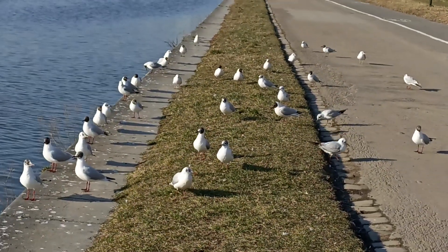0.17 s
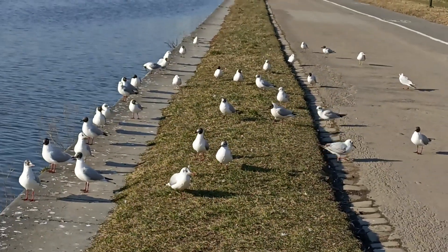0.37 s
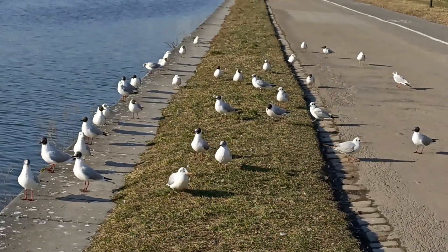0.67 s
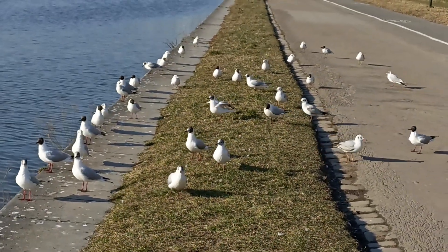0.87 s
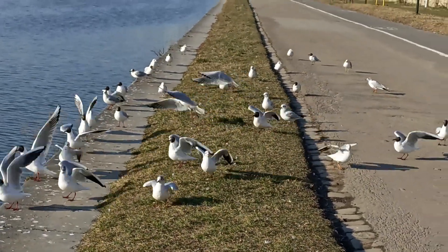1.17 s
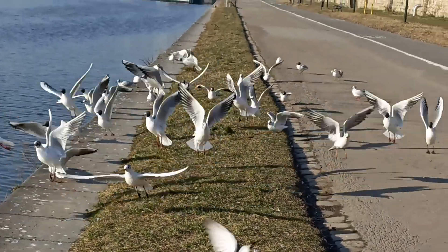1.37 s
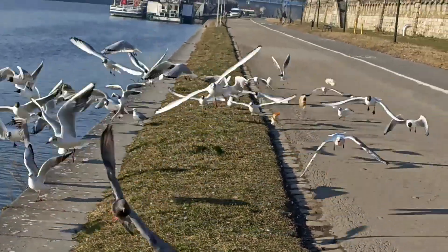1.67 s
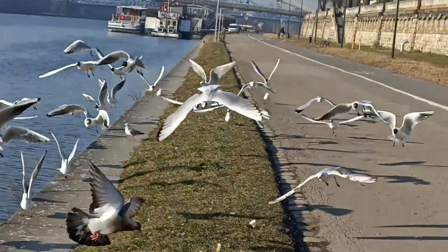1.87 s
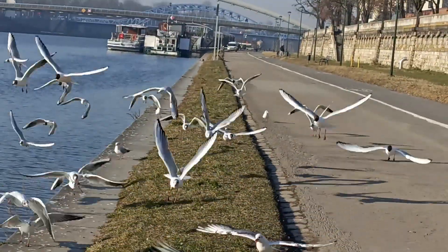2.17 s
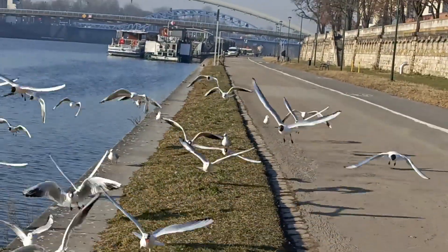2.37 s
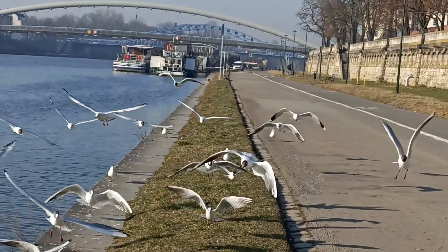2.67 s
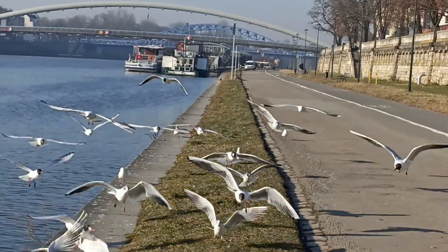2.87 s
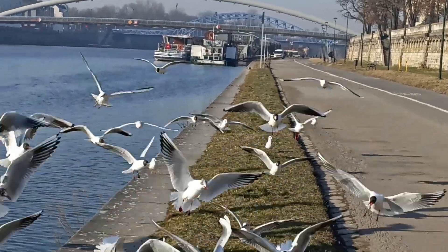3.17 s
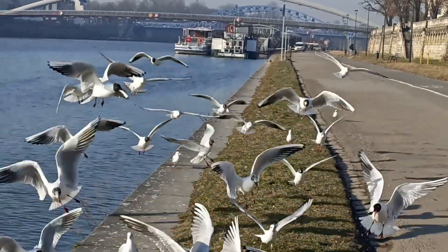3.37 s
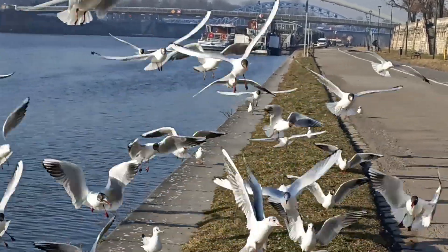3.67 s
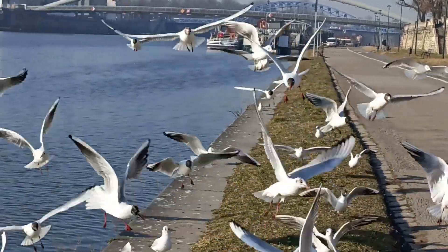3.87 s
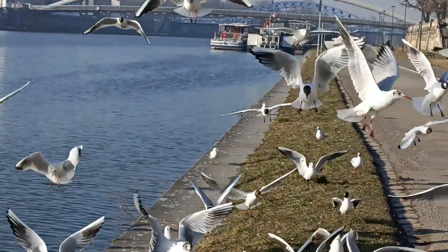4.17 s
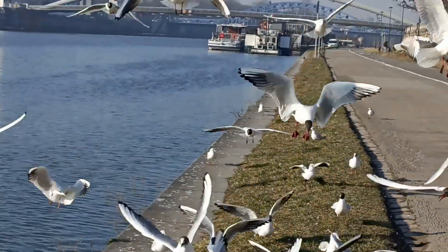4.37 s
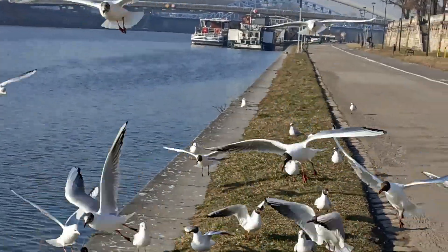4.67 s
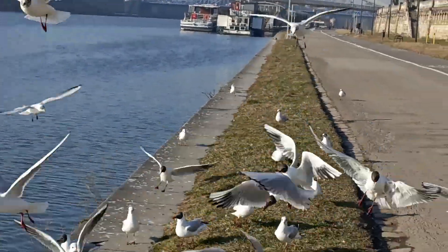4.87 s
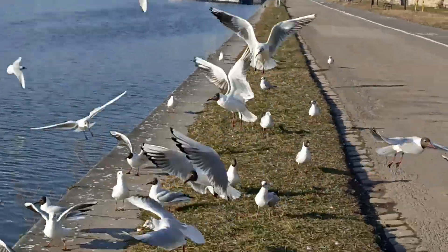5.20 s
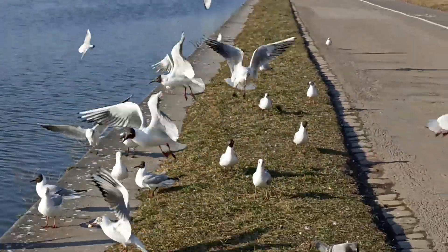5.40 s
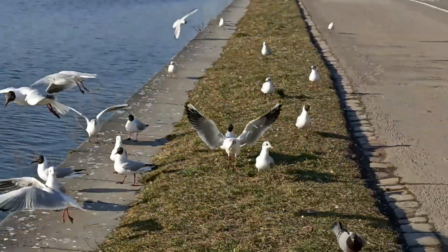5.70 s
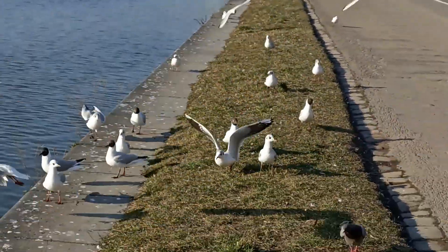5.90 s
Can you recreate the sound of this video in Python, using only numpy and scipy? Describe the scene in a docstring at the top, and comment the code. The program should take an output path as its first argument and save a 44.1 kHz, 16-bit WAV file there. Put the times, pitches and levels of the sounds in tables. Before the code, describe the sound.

Outdoors on a riverbank, low distant traffic and a tiny far songbird open quietly. After about a second gulls lift off with soft wing thumps and feather rustle, then short, rough, nasal squawks crowd in, mostly close on the left, with one longer climbing bird on the right. The squawking thins out and the flock settles to faint calls and flicks. Close stereo microphone.

```python
"""Gulls at a riverbank

Gulls take off and squawk over food, most of them close on the left, one on the right.
Each voice is a jittery harmonic stack with noise, chopped into fast throbs and filtered by resonances.
Wings rustle, thump and wash the air as shaped noise; a pigeon coos and a far tit sings two notes as
gliding or trembling sines; city traffic hums across the water as low noise."""
import sys
import numpy as np
from scipy import signal
from scipy.fft import rfft, irfft, next_fast_len
from scipy.io import wavfile
from scipy.ndimage import uniform_filter1d, map_coordinates

SR = 44100
rng = np.random.default_rng(int(sys.argv[2]) if len(sys.argv) > 2 else 0)


def generate_wav(sig):
    """Save sig (samples, or channels by samples) to the path in sys.argv[1] as 16-bit PCM at SR."""
    pcm = np.round(np.clip(np.atleast_2d(sig).T, -1, 1) * 32767).astype(np.int16)
    wavfile.write(sys.argv[1], SR, pcm)


N = 266364  # samples


def amp(db):
    """Decibels are a logarithm of amplitude: 20 dB is a factor of ten."""
    return 10 ** (np.asarray(db) / 20)


def unit(x):
    """Normalisation by mean power: scales x to an rms of 1."""
    return x / np.sqrt(np.mean(x ** 2) + 1e-20)


def along(points, hz):
    """Logarithmic frequency scale: interpolates (Hz, value) points along it."""
    f, v = np.transpose(points)
    return np.interp(np.log(hz + 1), np.log(f + 1), v)


def level(rows):
    """Amplitude envelope: gain per sample from (s, dB) rows, at -150 dB outside them."""
    s, db = np.transpose(rows)
    return amp(np.interp(np.arange(N) / SR, s, db, left=-150, right=-150))


def wobble(rate, size=N):
    """Band-limited random modulation: a smooth curve through rate random knots a second, at most 1000."""
    knots = rng.standard_normal(int(size * 1000 / SR) + 4)
    return map_coordinates(knots, [np.arange(size) * min(rate, 1000) / SR])


def filtered(x, response):
    """Linear filtering: the spectrum of x times a complex response of frequency."""
    n = x.shape[-1]
    m = next_fast_len(n + 4096)
    return irfft(rfft(x, m) * response(np.fft.rfftfreq(m, 1 / SR)), m)[..., :n]


def resonance(f, hz, width_hz):
    """Damped resonance: its gain at frequency f, 1 at the centre."""
    return f * width_hz / np.hypot(hz * hz - f * f, f * width_hz)


def rush(spectrum, alike, patchy_db):
    """Turbulent noise: coloured, of set left-right likeness, patchy in time and pitch, rms 1 on the left."""
    z = signal.stft(rng.standard_normal((2, N)), nperseg=512)[2]
    field = uniform_filter1d(rng.standard_normal(z.shape[1:]), size=6, axis=0)
    field = uniform_filter1d(field, size=10, axis=1)
    pair = signal.istft(z * amp(patchy_db * unit(field)), nperseg=512)[1][:, :N]

    def mid_side_response(hz):
        # weights cos and sin of half the angle give mid + side and mid - side the wanted correlation
        turn = np.arccos(np.clip(along(alike, hz), -1, 1)) / 2
        return amp(along(spectrum, hz)) * [np.cos(turn), np.sin(turn)]

    mid, side = filtered(pair, mid_side_response)
    return np.array([mid + side, mid - side]) / np.std(mid + side)


def add(out, s, sound):
    """Superposition: sums a sound into out from s seconds on."""
    start = round(s * SR)
    out[:, start:start + sound.shape[-1]] += sound[..., :N - start]


def gulls():
    """Comb interference: the climbing bird is heard with a sliding echo, among the direct cries of the flock."""
    # Short squawks. Each row: start, rise, hold and fall in seconds, crest level in dB, crest pitch in Hz,
    # throbs per second, throb depth 0-1, roughness 0-1, beak resonance in Hz, windpipe resonance in dB,
    # treble in dB per octave above 3800 Hz, up to one octave
    squawks = [(1.405, .05, 0.014, 0.012, -37, 900, 78, 0.7, 0.77, 2640, -23, -6),
               (1.625, 0.029, 0.012, .02, -39.5, 756, 62, 0.33, 0.2, 2880, -9, -3),
               (1.67, 0.042, 0.0056, 0.047, -25.5, 1015, 41, 0.04, 0.57, 3040, -4, 0),
               (1.918, 0.046, 0.005, 0.023, -24.5, 1124, 62, 0.54, .65, 3100, 0.5, 4),
               (2.025, 0.066, .01, 0.026, -21, 876, 72, 0, 0.87, 2675, -43, -1),
               (2.115, 0.057, 0.064, 0.039, -22.5, 876, 61.5, 0.71, 0.67, 2570, -40, -2),
               (2.488, 0.0343, 0.014, 0.057, -24.5, 900, 95, 0, .9, 2840, -25, -2),
               (2.577, 0.047, 0.011, 0.077, -30, 825, 78, 0.52, 0.86, 3360, -8.5, 4),
               (2.668, 0.024, 0.048, 0.048, -31.5, 859, 69, 0.52, 0.86, 3060, -8.5, 6),
               (2.83, .04, 0.018, 0.041, -28, 1141, 62, 0.47, 0.63, 3520, -4, 4.5),
               (2.898, 0.026, 0.0052, 0.07, -24, 1184, 69, .72, 0.42, 3600, -5.5, 3),
               (2.967, .015, 0.042, 0.039, -32, 956, 52, 0.74, 0.76, 3240, -3.5, 5.5),
               (3.085, .05, 0.0058, 0.047, -28, 945, 73, 0.9, 0.62, 3340, -7, 3.5),
               (3.184, 0.0061, 0.032, 0.029, -32, 843, 62, 1, 0.83, 2860, -9, -2),
               (3.232, 0.035, .005, 0.072, -20.5, 993, 86, 0.5, 0.52, 3060, -17, -3),
               (3.34, 0.016, 0.033, 0.029, -23, 970, 69, 0.64, 0.5, 3420, -8, 2.5),
               (3.426, 0.044, 0.0027, 0.039, -20, 1031, 64, 0.65, 0.63, 3170, -5.5, 2.5),
               (3.517, 0.017, 0.04, 0.022, -31, 933, 65, 1, 0.5, 3100, -7, 6),
               (3.572, .018, 0.0025, 0.028, -23.5, 1238, 68, 1, 0.2, 3050, -15, -10),
               (3.637, 0.032, 0.02, 0.044, -20.5, 1095, 90, 0.61, 0.61, 3430, -2, 2.5),
               (3.728, 0.0071, 0.038, 0.044, -34, 920, 81, 0.2, 0.76, 3240, 6.5, 9),
               (3.796, 0.041, 0.023, 0.038, -24.5, 896, 79, 0.25, 0.99, 2940, -8.5, 2),
               (3.88, 0.021, 0.0087, 0.034, -24, 1063, 94, 0.8, 0.45, 3200, -1, 2.5),
               (3.926, 0.02, 0.0036, 0.038, -20, 1070, 76, 0.9, 0.36, 3100, -27, -4.5),
               (3.988, .038, 0.0046, 0.051, -21, 1087, 82, .75, 0.6, 3380, -5, -3.5),
               (4.089, 0.012, 0.037, .015, -39.5, 890, 46, 0.2, 0.94, 3370, 6, 0),
               (4.143, 0.051, 0.0031, 0.049, -22.5, 1076, 90, 0.73, 0.44, 3420, 1.5, 2),
               (4.265, 0.032, 0.038, 0.018, -38, 944, 80, 0.73, 0.6, 3000, 5, 4),
               (4.473, 0.037, 0.0152, 0.0316, -23, 1004, 88, 0.6, 0.41, 3100, 2.5, 4),
               (4.545, 0.01, 0.025, 0.012, -32.5, 867, 83, 0.9, 0.33, 3200, 4, 5),
               (4.64, 0.029, 0.0044, 0.026, -39, 935, 89, .8, 0.4, 3300, -1, 8),
               (4.812, 0.026, 0.017, 0.03, -25, 869, 86, 0.6, 0.46, 3400, -6, 0.5),
               (4.943, 0.044, .004, .03, -46, 830, 60, .95, 1, 3050, -11, 10),
               (5.115, .015, 0.027, .02, -54.5, 875, 92, 0.8, .43, 3550, -15, 10),
               (5.173, 0.019, 0.014, .015, -49.5, 866, 100, 0.6, .6, 3030, 5, -2),
               (5.463, 0.048, .03, 0.025, -36.5, 939, 64, 0.33, 0.58, 3500, 2.5, -3),
               (5.541, 0.0095, 0.067, 0.08, -38.5, 840, 61.1, .55, 0.43, 3280, 1.5, 2.5),
               (5.742, .006, 0.013, .025, -48.5, 866, 56, 0.3, 0.8, 3600, -7, 7)]
    # The loudest, drawn-out cry. Each row: time in seconds, level in dB, pitch in Hz
    cry = [(2.3266, -30, 877), (2.338, -24, 936), (2.365, -22, 1043), (2.4, -20.5, 1147),
           (2.44, -20.5, 1157), (2.5, -20.5, 1201), (2.53, -28.5, 1110), (2.57, -28, 956)]
    # Its one row: throbs per second, depth 0-1, roughness 0-1, beak in Hz, windpipe in dB, treble in dB
    # as above, leftness (negative to the right), lag of the left behind the right in ms
    cry_manner = (64.4, .88, .38, 3400, -18, 4, 1, -.022)
    # The long call on the right, climbing. Each row: time in seconds, level in dB, pitch in Hz
    screech = [(1.6979,-40,918),(1.72,-38,951),(1.85,-34,906),(1.93,-34.5,858),(2.03,-37.5,1007),(2.15,-39,892),(2.29,-48,730)]
    # Its one row: the same columns as for the cry
    screech_manner = (65, .95, .45, 5400, 4, 0, -.3, -.48)
    # The ground echo lags more as the bird climbs. Each row: time in seconds, lag in ms
    bounce = [(1.7, 0.5), (2.0, 0.94), (2.3, 1.16)]

    out, climber = np.zeros((2, 2, N))
    for row in squawks:
        add(out, row[0], squawk(*row))
    add(out, cry[0][0], call(cry, *cry_manner, width_hz=1300))
    add(climber, screech[0][0], call(screech, *screech_manner, width_hz=4000))
    t = np.arange(N) / SR
    late = t - np.interp(t, *np.transpose(bounce)) / 1000
    echo = np.array([map_coordinates(port, [late * SR]) for port in climber])
    return out + climber + .7 * echo


def squawk(start, rise, hold, fall, db, hz, *manner):
    """Pressure-driven voice: level and pitch climb to the crest together, hold, and fall together."""
    rise_db, fall_db = 10.5, 17
    # both ends sink towards the slack pitch, keeping this share of the crest's excess
    slack_hz, slack_share = 840, .3
    # The callers stay left, one crosses towards the middle. Each row: time in seconds, leftness 0-1
    leftness = [(4.3, 1.0), (4.8, .6), (4.95, 1.0)]
    end_hz = slack_hz + slack_share * (hz - slack_hz)
    s = start + np.cumsum([0, rise, hold, fall])
    levels = db - np.array([rise_db, 0, 0, fall_db])
    rows = np.transpose([s, levels, [end_hz, hz, hz, end_hz]])
    left = np.interp(start, *np.transpose(leftness))
    return call(rows, *manner, left, lag_ms=0.065, width_hz=1360)


def call(rows, rate, depth, rough, beak_hz, pipe_db, treble_db, left, lag_ms, width_hz):
    """Source and filter: a throbbing syrinx drives beak and windpipe resonances, heard at two ports."""
    # Throat colour. Each row: frequency in Hz, relative level in dB
    throat = [(400,-13),(700,-9),(1150,-2.5),(1500,6.5),(1950,-2),(2600,0),(4200,-3),(5200,-1),(6500,-0.5),(8200,-13.5),(10500,-17.5),(12000,-10.5),(13500,-19.5),(15700,-36)]
    # Left over right at a leftness of 1. Each row: frequency in Hz, level difference in dB
    shadow = [(400,1),(1000,5),(1900,12),(3800,13),(5200,5),(7200,-3),(9500,16),(15000,22)]
    # Windpipe resonance. Its one row: centre in Hz, width in Hz
    windpipe = (1850, 650)
    # above this the voice swells more steeply with effort, by this power
    bright_from_hz, bright_grows = 4200, .5

    def rounded(v):
        return uniform_filter1d(v, size=500, mode="nearest")  # muscles move smoothly

    s, db, hz = np.transpose(rows)
    t = s[0] + np.arange(round((s[-1] - s[0]) * SR)) / SR
    gain = rounded(np.interp(t, s, amp(db / 2))) ** 2
    effort = gain / gain.max()

    # the harder the cry, the deeper its throbs
    depth = np.minimum(depth * (.7 + .55 * effort), .97)
    beat = (t - s[0]) * rate + 0.05 * wobble(38.1, size=len(t))
    turn = beat % 1
    # the syrinx opens, holds and shuts briefly between throbs
    gate = np.clip(np.minimum(turn / .17, (.88 - turn) / .13), 0, 1)
    sizes = amp(1.8 * depth * rng.standard_normal(64)[np.floor(beat).astype(int) % 64])
    throb = (1 - depth + depth * gate) * sizes

    # pitch arches with the pressure of each throb and wanders slowly besides
    arch = .08 * depth * (np.sin(np.pi * turn) - .6) + .02 * wobble(60, size=len(t))
    jitter = (0.012 + 0.075 * rough) * wobble(400, size=len(t))
    pitch = rounded(np.interp(t, s, hz)) * (1 + arch + jitter)
    phase = 2 * np.pi * np.cumsum(pitch) / SR
    k = np.arange(1, 15)[:, None]  # harmonic numbers
    weights = 1 + 0.15 * (k == 3)
    stack = unit(np.sum(np.sin(k * phase + k * k) * weights, axis=0))
    half = np.cos(phase / 2)  # strong and weak cycles alternate in rough voices
    hiss = rng.standard_normal(len(t))
    source = np.sqrt(1 - rough ** 2) * stack * (1 + .6 * rough * half) + .75 * rough * hiss

    def tract(f):
        beak = resonance(f, beak_hz, width_hz) ** 2
        pipe = amp(pipe_db) * resonance(f, *windpipe) ** 2
        open_beak = amp(treble_db * np.clip(np.log2((f + 1) / 3800), 0, 1))
        return (beak + 0.1 + pipe) * open_beak * amp(along(throat, f))

    voice = unit(filtered(source * throb, tract))
    top = filtered(voice, lambda f: 1 / (1 + (bright_from_hz / (f + 1)) ** 6))
    voice = voice - top * (1 - effort ** bright_grows)
    edge = np.clip(np.minimum(t - t[0], t[-1] - t) / .01, 0, 1)  # 10 ms fades
    voice = np.pad(voice * edge * gain, 64)

    ports = np.array([[1], [-1]])  # left, right

    def direction(f):
        difference = amp(ports * left * along(shadow, f) / 2)
        return difference * np.exp(-1j * np.pi * f * ports * lag_ms / 1000)

    pair = filtered(voice, direction)
    return pair * np.std(voice) / np.std(pair.mean(axis=0))


def scatter(x):
    """Diffuse reflection: ground, water and wall return a short blur, different at each port."""
    t = np.arange(SR // 4) / SR
    # amplitude decays by 60 dB in 0.022 s, and a weaker tail in 0.37 s
    decay = amp(-60 * t / 0.022) + 0.15 * amp(-60 * t / 0.37)
    tail = rng.standard_normal((2, len(t))) * decay
    return signal.fftconvolve(x[:1], tail / np.linalg.norm(tail[0]), axes=1)[:, :N]


def wings():
    """Aerodynamic noise: feather rustle, low thumps of pushed air, wash and short flicks."""
    # Feather colour. Each row: frequency in Hz, relative level per Hz in dB
    feathers = [(2060, 7), (3500, 4), (3730, -7), (4200, 6), (4670, -2.5), (6540, -8), (8400, -17.5),
                (10700, -11), (12100, -0.5), (15600, -14.5)]
    # Rustle. Each row: time in seconds, mean level on the left in dB
    rustle_rows = [(0.0, -84), (0.44, -66), (1.66, -48.5), (1.93, -46), (3.82, -47), (4.31, -55),
                   (6.04, -56.5)]
    # Wings pushing air at take-off. Each row: time in seconds, level in dB
    beats = [(1.625, -39), (1.745, -39), (1.885, -40), (1.98, -42), (2.095, -45)]
    # Air stirred by the whole flock lifting. Each row: time in seconds, level in dB
    stir = [(1.4, -58), (1.8, -45), (2.2, -55)]
    # Air washing off wings nearby. Each row: time in seconds, level in dB
    wash_rows = [(2.1, -52.5), (2.5, -50), (3.4, -46.5), (3.95, -45), (4.3, -49), (4.7, -79)]
    # Feather flicks. Each row: start in seconds, level before balance, attack and feather colour in dB
    ticks = [(0.7904, -44), (0.8444, -47), (0.9194, -42), (1.0839, -45), (4.4145, -43), (4.8944, -49),
             (5.253, -35.5), (5.7298, -39)]
    beat_s = 0.04  # half-width of one push
    tick_t60_s, tick_attack_s = 0.034, 0.00094

    flutter = amp(2.5 * wobble(20))
    rustle = level(rustle_rows) * amp([[0], [-5]]) * flutter
    rustle = rustle * rush(feathers, [(5000, 0.085)], patchy_db=3.5)

    t = np.arange(N) / SR
    pushes = sum(amp(db) * np.exp(-((t - s) / beat_s) ** 2) for s, db in beats)
    low_air = [(30, -50), (80, -3.5), (180, -7), (350, -20.5), (900, -53)]  # (Hz, relative dB)
    thumps = (pushes + level(stir)) * rush(low_air, [(100, 0.31)], patchy_db=2.0)

    mid_air = [(250, -46), (500, -9), (700, -4), (1100, -5.0), (2000, -29.5)]  # (Hz, relative dB)
    wash = level(wash_rows) * rush(mid_air, [(600, 1.0)], patchy_db=6.0)

    flicks, t = np.zeros((2, N)), np.arange(SR // 10) / SR
    for s, db in ticks:
        envelope = amp(db - 60 * t / tick_t60_s) * (1 - np.exp(-t / tick_attack_s))
        add(flicks, s, envelope * rng.standard_normal((2, len(t))) * amp([[2.5], [-2.5]]))
    return rustle + thumps + wash + filtered(flicks, lambda hz: amp(along(feathers, hz)))


def pigeon():
    """Frequency modulation: one soft coo, a gliding sine made slightly husky by random pitch shake."""
    # The coo. Each row: time in seconds, pitch in Hz, level in dB
    coo = [(2.47, 622, -80), (2.516, 672, -41), (2.8, 704, -62)]
    s, hz, db = np.transpose(coo)
    pitch = np.interp(np.arange(N) / SR, s, hz) * (1 + .07 * wobble(200))
    tone = np.sqrt(2) * np.sin(2 * np.pi * np.cumsum(pitch) / SR)
    return level(np.transpose([s, db])) * tone


def tit():
    """Pure tones: thin far whistles, sines with a slight phase tremble and soft ends."""
    # Notes. Each row: start in seconds, pitch in Hz, peak level in dB ahead of the left-right balance
    notes = [(.36, 4100, -67), (.618, 4050, -67), (.693, 5140, -67), (.864, 4100, -63), (.95, 5050, -69),
             (1.18, 4080, -65), (1.49, 4080, -65), (4.43, 4180, -67), (4.69, 4140, -76), (4.763, 5160, -63),
             (5.104, 4950, -66), (5.23, 4120, -62), (5.357, 5050, -66), (5.77, 4150, -62),
             (5.855, 4920, -66)]
    low_note_s, high_note_s, high_from_hz = .072, 0.029, 4600
    out = np.zeros((2, N))
    for s, hz, db in notes:
        length = high_note_s if hz > high_from_hz else low_note_s
        t = np.arange(round(length * SR)) / SR
        tone = np.sin(2 * np.pi * hz * t + .5 * wobble(60, size=len(t)))
        note = tone * np.sin(np.pi * t / length) ** 0.38
        add(out, s, amp(db) * note * amp([[-1.5], [1.5]]))
    return out


def traffic():
    """Diffuse sound field: far roads and boats merge into a low roar, alike at both ports only in the bass."""
    # Each row: frequency in Hz, relative level per Hz in dB
    spectrum = [(25,-31),(45,-40),(60,-7.5),(115,-2.5),(185,-6.5),(270,-11.5),(460,-15.5),(860,-18.5),(2200,-24),(3450,-30),(3800,-43),(6800,-39),(7300,-48),(15700,-60)]
    # Each row: frequency in Hz, left-right correlation
    likeness = [(60,.55),(130,.6),(290,.7),(640,.3),(1410,-.2),(3100,0)]
    # Each row: time in seconds, mean level in dB
    hum = [(0.0, -42), (3.75, -40), (6.04, -42)]
    return level(hum) * amp(0.2 * wobble(3.8)) * rush(spectrum, likeness, patchy_db=1.23)


def scene():
    """Superposition: direct birds, the blur of the gulls' reflections, wings and background add up."""
    birds = gulls()
    blur = amp([[-10], [-11.5]]) * scatter(birds)
    return birds + blur + tit() + pigeon() + wings() + traffic()


def record(dry):
    """Band limiting: an ideal low-pass keeps nothing above the top frequency."""
    top_hz = 15762
    return filtered(dry, lambda hz: hz < top_hz)


dry = scene()
out = record(dry)
generate_wav(out)
```